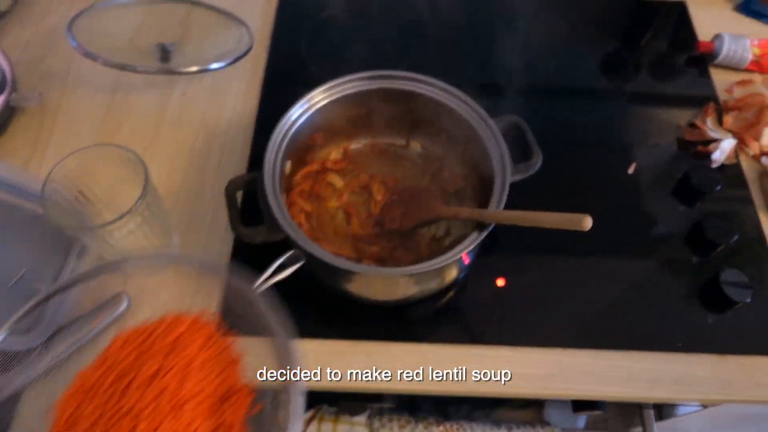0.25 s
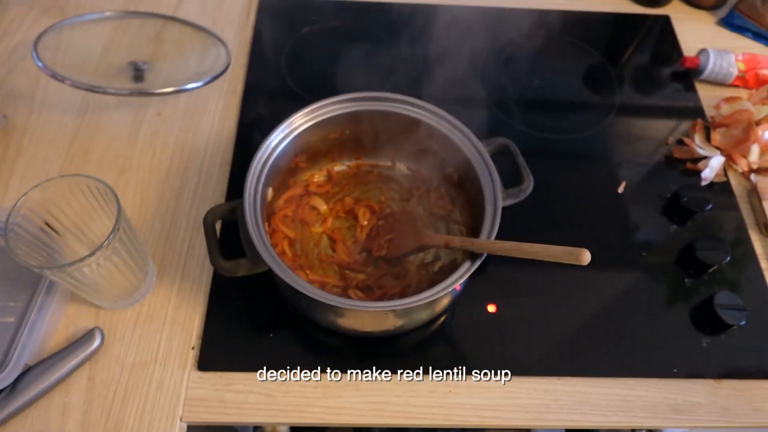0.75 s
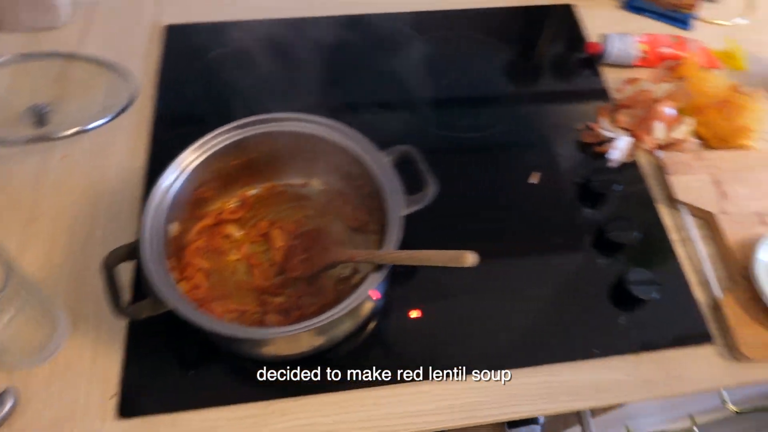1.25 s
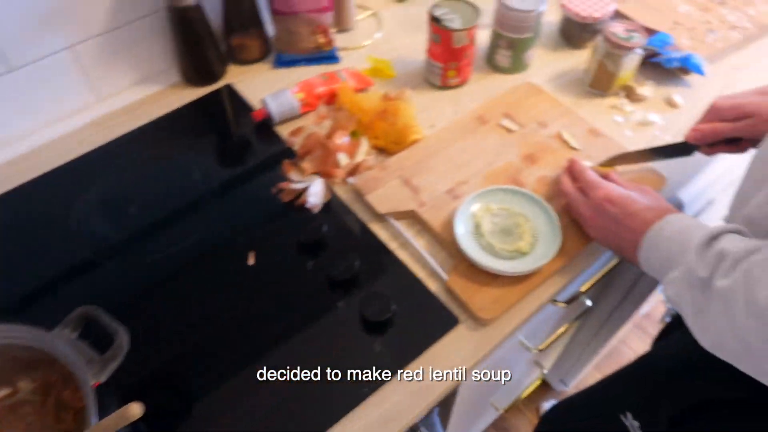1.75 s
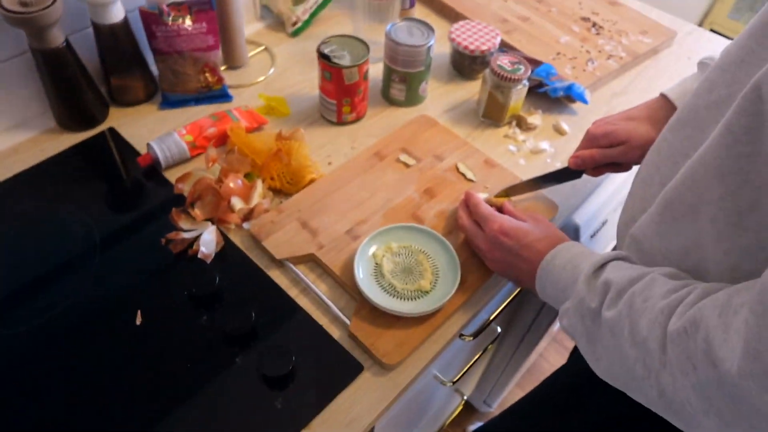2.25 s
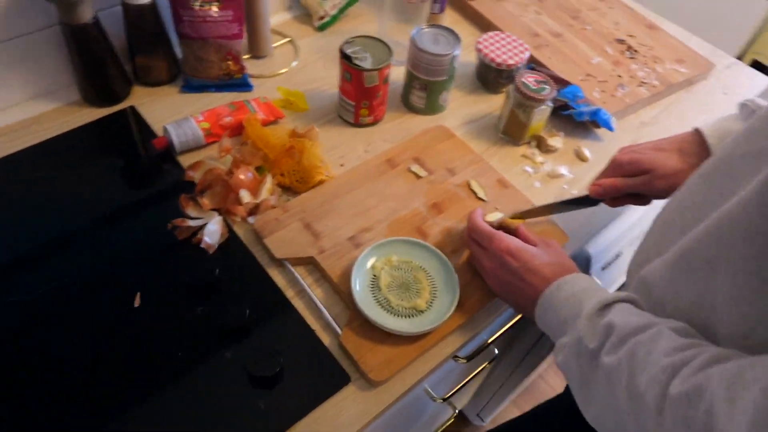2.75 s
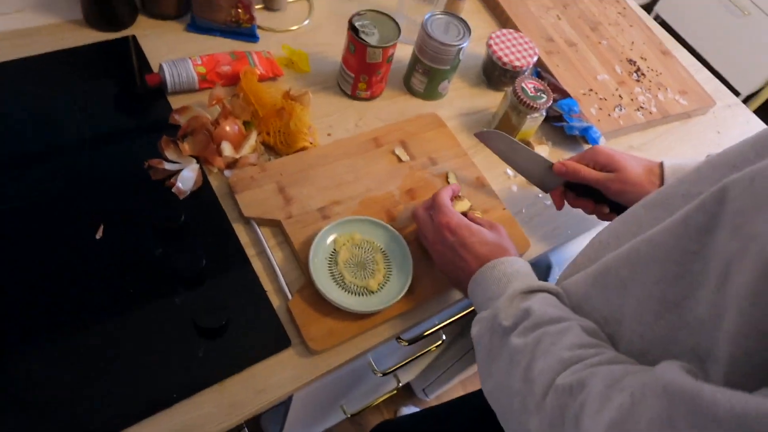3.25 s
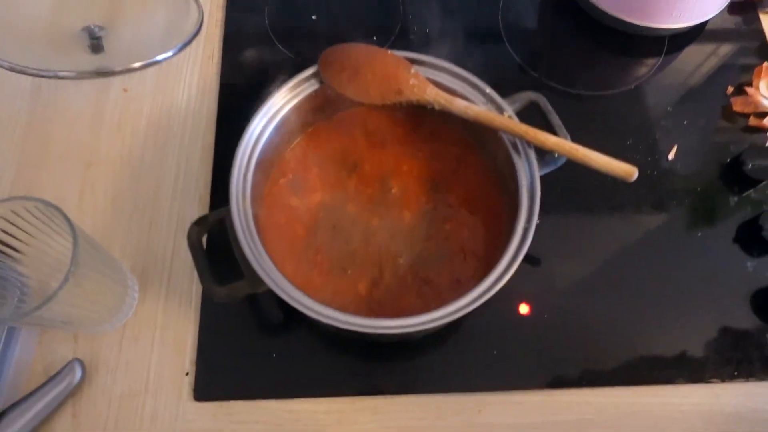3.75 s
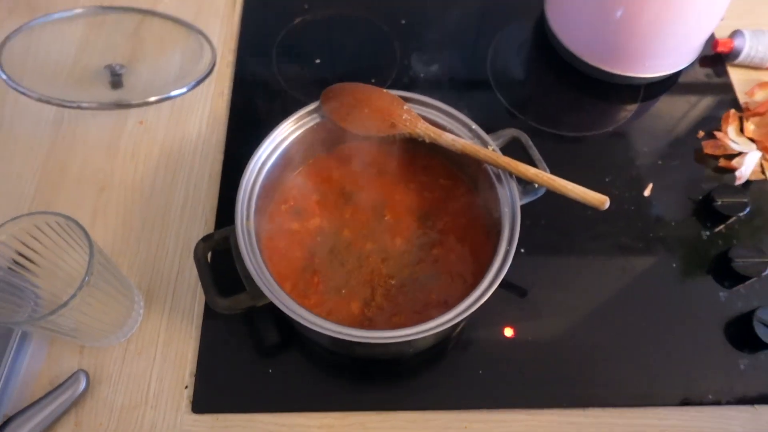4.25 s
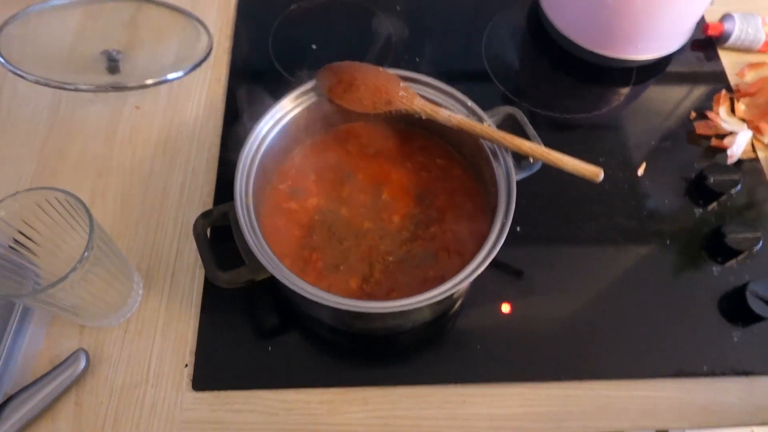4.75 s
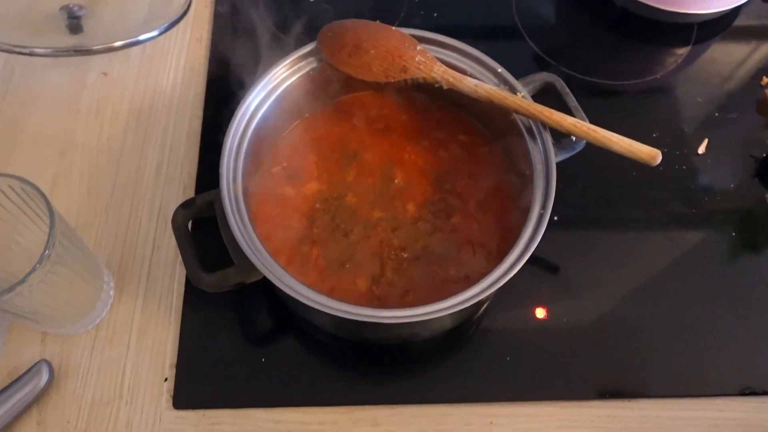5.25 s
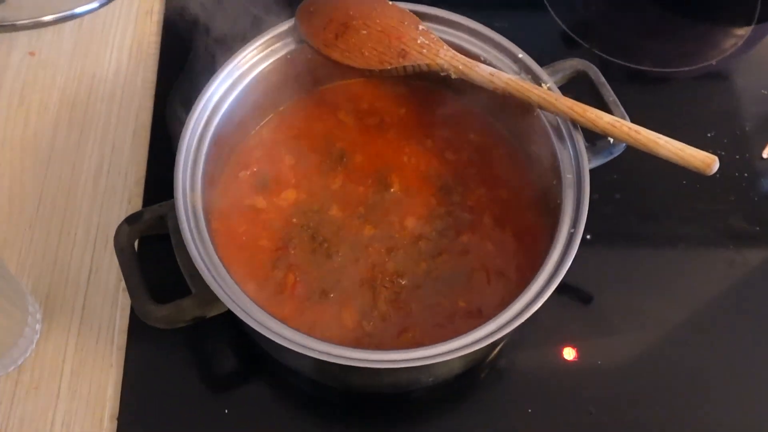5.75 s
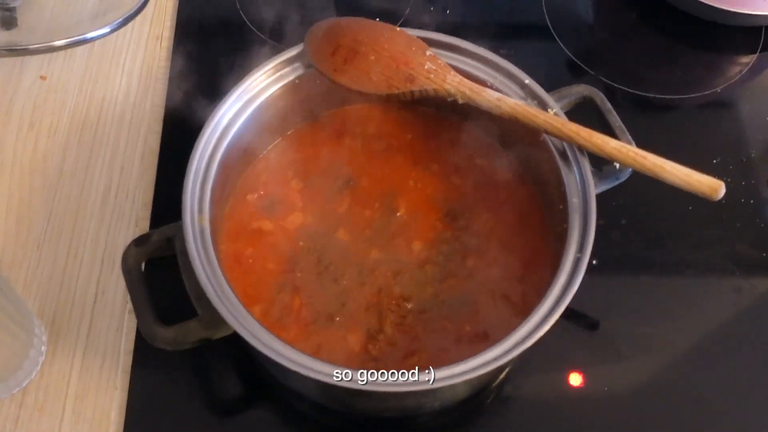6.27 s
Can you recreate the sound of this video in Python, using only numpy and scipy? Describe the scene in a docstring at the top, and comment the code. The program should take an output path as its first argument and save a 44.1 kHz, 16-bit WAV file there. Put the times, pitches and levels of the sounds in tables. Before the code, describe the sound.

A faint low thud fades under frying onions, with the pot ringing lightly. A sharp double snap opens a short, loud rush of wet hiss, quickly gone. Knife ticks and dull board knocks follow over quieter sizzle. The sound cuts almost to silence, then dense soup bubbling swells in, slightly right: crackly steam puffs, wet pops and clear plops. Close small-device microphone in a kitchen, taming loud peaks, with quiet appliance rumble.

```python
"""A soft low thud fades under onions frying in a steel pot: crackly noise, ringing pot tones and short spits.
A knife ticks, knocks and scrapes on a wooden board, and one wet burst of hiss goes off with a double snap.
After a short, almost silent gap thick soup fades in: seething noise, crackly puffs of bursting steam bubbles
and clear little plop notes. A faint appliance hum of rumble and wavering tones lies under both scenes.
The small microphone turns loud sounds down by itself (automatic gain control)."""
import sys
import numpy as np
from scipy import signal
from scipy.fft import rfft, irfft, next_fast_len
from scipy.io import wavfile
from scipy.ndimage import uniform_filter1d

SR = 44100
rng = np.random.default_rng(int(sys.argv[2]) if len(sys.argv) > 2 else 0)


def dump_mix(stems):
    """Bounce the given channels to the path in sys.argv[1] as a 16-bit WAV at rate SR."""
    frames = np.atleast_2d(stems).T  # one column per channel
    limited = np.clip(frames, -1, 1)  # hard clip at full scale
    pcm = np.round(limited * 32767).astype(np.int16)
    wavfile.write(sys.argv[1], SR, pcm)


N = 287091   # length [samples]
FIRST_ENDS_S, SECOND_STARTS_S = 3.566, 3.63
TURN_START_S, TURN_END_S = 1.3, 4   # the microphone turns from pot to board

# frying as the microphone swings over the pot and away:
# (time [s], sizzle [dB], lower ring of the pot [dB], upper ring [dB])
FRY_LEVELS = [(0.0, -36.5, -48, -71), (0.4, -36.5, -47.5, -76), (0.55, -35.5, -43, -57),
              (0.72, -35.5, -38, -48), (0.95, -35, -40, -51), (1.1, -33.5, -45, -40), (1.44, -36, -46, -80),
              (1.73, -39.5, -49, -80), (1.98, -36, -59, -78), (2.19, -39.5, -63, -75), (3.0, -39, -66, -57),
              (3.57, -40, -53, -61)]
# tone colour of the sizzle: (frequency [Hz], level [dB per Hz])
FRY_COLOUR = [(300, -30), (400, -19), (640, -9.5), (700, 0.5), (800, -4.5), (1000, -10), (1150, -3),
              (1600, -4), (2100, -1.5), (2900, 0.5), (6000, -1.5), (12000, -3), (16000, -5)]
# fat spitting in the pan: (time [s], nominal level [dB], frequency [Hz])
SPITS = [(0.536, -22, 9500), (0.839, -20, 4500), (1.017, -18.5, 7000), (0.5303, -21.5, 4200),
         (0.555, -24, 6500), (0.597, -24, 6800), (0.638, -23, 6800), (0.6545, -21, 6900),
         (0.723, -20, 6600), (0.7435, -21, 6570), (0.765, -20, 6000), (0.8565, -24, 6800),
         (0.922, -20, 7200), (1.007, -21, 6500), (1.401, -27, 5000), (0.9764, -16.5, 5100),
         (1.281, -23, 7070), (1.4497, -25, 4850), (1.664, -24, 9000), (1.746, -23, 4760),
         (1.7592, -15, 4700), (1.9207, -25, 4470), (1.9748, -19.5, 2300), (2.3484, -26, 9000),
         (2.366, -27, 5950)]
# the pot's two bright resonances: (frequency [Hz], width [Hz])
FRY_POT_RINGS = [(4700, 4350), (6700, 1500)]
# how alike left and right are for the frying: (frequency [Hz], likeness [0-1])
FRY_LIKENESS = [(60, .97), (400, .93), (700, .95), (1300, .988), (4400, .994), (8000, 1.0), (15000, 1.0)]
# the same once the pot lies off to the side: (frequency [Hz], likeness [0-1])
FAR_LIKENESS = [(200, .94), (400, .86), (1300, .86), (2400, .9), (4400, .82), (8000, .998), (15000, 1.0)]
AIR_DB = -14   # bright air against the sizzle
SPIT_CLICK_DB = -2   # opening click against the spit's nominal level

# a low thud dies away in the room: (frequency [Hz], level [dB], time to fall 60 dB [s])
THUD_MODES = [(112, -54, 0.58), (190, -49, 0.4), (229, -52, 0.4)]

# appliance noise: (time [s], rumble [dB], hum [dB])
APPLIANCE_LEVELS = [(0, -54.5, -66), (.3, -69.5, -69.5), (1, -67, -69), (1.5, -67, -73), (3.56, -65, -80.5),
                    (3.575, -105, -92), (3.63, -89, -90), (3.78, -76, -71), (3.9, -64.5, -58.5),
                    (6.51, -64.5, -55.5)]
# tone colour of the rumble: (frequency [Hz], level [dB per Hz])
RUMBLE_COLOUR = [(40, -52), (100, -30), (165, -43), (200, -10.5), (270, -15), (340, -1.5), (450, -15),
                 (560, -6), (700, -23), (900, -4), (1300, -53)]
# wavering motor lines, levels as at the second row of the appliance noise: (frequency [Hz], level [dB])
MOTOR_LINES = [(100, -94), (199, -80), (246, -82.5), (399, -73.5)]
HUM_HZ, HUM_WAVER_HZ = 372.5, 1.47

# knife blade ticks:
# (time of the top [s], level [dB], frequency [Hz], spread [ms], crack above the ring [dB])
TICKS = [(2.099, -33, 2400, .4, -12), (2.125, -25.5, 2160, 0.57, 12.5), (2.1359, -16.5, 2330, .8, -4),
         (2.1805, -26, 2400, 0.45, -19), (2.192, -22, 2440, 0.62, -3), (2.8332, -26, 2360, 0.484, -4),
         (3.0667, -33, 2600, 0.48, -14), (3.1834, -33, 2300, .8, -8), (3.316, -18, 2190, 0.5, -15),
         (3.3778, -20.5, 2300, 0.5, -21), (3.423, -29, 2400, .8, -10), (3.4537, -26, 2300, 0.41, -17)]
# dull knocks on the board: (time [s], level [dB], centre [Hz], share of the free ring time [ratio])
KNOCKS = [(0.336, -43, 320, 1.4), (1.759, -48, 400, 0.69), (2.124, -36, 720, 0.55), (2.805, -45, 560, 0.74),
          (2.828, -45, 380, 1.4), (3.028, -45.5, 427, 0.73), (3.136, -38.5, 376, 0.62)]
# ways the board rings: (frequency [Hz], level against the knock [dB], free time to fall 60 dB [s])
BOARD_MODES = [(334, -1, 0.09), (464, -1, 0.063), (525, 5, 0.047), (610, 7, 0.063), (760, 0, 0.035),
               (1000, 2, 0.03)]
# blade scraping and peeling: (start [s], length [s], level [dB], frequency [Hz], width [Hz])
SCRAPES = [(1.924, 0.18, -42, 2770, 2500), (3.018, 0.1, -46, 2350, 700), (3.127, 0.094, -45, 2220, 580),
           (3.405, 0.099, -44.5, 2300, 520)]
TICK_T60_S, TICK_TAIL_DB = .012, -16   # fall of the crack by 60 dB; the blade rings on faintly
KNOCK_PUFF_DB = -7   # dry rattle of the board against the knock's level
KNOCK_FALL_DB = 14   # loss of a mode one octave from the knock's centre
STROKE_EDGE_S = 0.011   # a scraping stroke sets in and lifts off
KNIFE_PAN_DB = 3.5   # the board lies a little to the left
WALL_DB, WALL_LAG_S = -10, .0007   # the tiled wall returns the knife from the side

# tone colour of the wet burst: (frequency [Hz], level [dB per Hz])
BURST_COLOUR = [(60, -58), (113, -26), (140, -43), (190, -14.5), (220, -23), (280, -19), (505, -22),
                (900, -13.5), (1300, -6), (2340, -2.5), (2910, -6), (3630, -5.5), (4900, -14.5),
                (5600, -29), (9000, -63)]
SNAP_S, SNAP_DB = 1.033, -10
SECOND_SNAP_LAG_S, SECOND_SNAP_DB = .0026, -8   # after and against the first snap
SNAP_HOLD_S = 0.0011
# the burst swells to its top, holds, then dies at a steady rate
BURST_DB, BURST_SWELL_DB, BURST_SWELL_S, BURST_HOLD_S, BURST_FALL_DB_PER_S = -8, 2, 0.0085, 0.052, 145.5
BURST_BASS_HZ, BURST_BASS_RISE_S = 500, 0.057   # the low end of the burst builds later

# vigour of the simmer between the bursts: (time [s], seething [dB])
SIMMER_LEVELS = [(3.6, -66), (3.635, -66), (3.68, -69), (3.78, -55), (3.97, -40), (4.05, -44.5),
                 (4.13, -48.5), (4.23, -44), (4.36, -42), (4.48, -40), (4.61, -47), (4.66, -43.5),
                 (4.76, -52), (4.84, -48), (4.98, -42.5), (5.12, -47.5), (5.2, -44.5), (5.38, -44.5),
                 (5.6, -42.5), (5.71, -41), (5.96, -42.5), (6.14, -40), (6.51, -44)]
# tone colour of the simmer: (frequency [Hz], level [dB per Hz])
SIMMER_COLOUR = [(200, -38), (290, -13), (450, -7.5), (563, -13.5), (694, 2.5), (979, -2.5), (1530, -3),
                 (2260, -2.5), (2870, -2), (6430, 2), (15100, -17.5), (16000, -14)]
# the pot colours the seething: (frequency [Hz], width [Hz], level [dB])
SEETHE_RINGS = [(1650, 340, -17), (2300, 290, -15), (3500, 480, -15.5), (5430, 450, -15)]
# how alike left and right are for the soup: (frequency [Hz], likeness [0-1])
SOUP_LIKENESS = [(60, 0.97), (240, 0.94), (950, 1), (1300, 0.9), (3770, 0.59), (9000, 0.6), (15000, 1)]
STEAM_DB = -2.5   # against the seething

# air and steel of the soup pot: (frequency [Hz], width [Hz], relative level [dB])
SOUP_POT_RINGS = [(808, 23, 14), (1325, 20, 3), (1580, 79, 7), (2040, 1120, 2.5), (3290, 31, -3),
                  (4800, 35, -8)]
# soup bubbles bursting, levels and fade time before the puff's own scaling:
# (time [s], peak of the body [dB], middle spit [dB], bright spray [dB], note [Hz], time to fall 60 dB [s])
BUBBLES = [(3.642, -48, -50.5, -51, 2210, 0.24), (3.698, -50, -47.5, -53, 3570, 0.086),
           (3.719, -37.5, -48, -56, 3510, 0.11), (3.743, -39, -43, -58, 1670, 0.044),
           (3.792, -37, -41, -52, 3520, 0.22), (3.826, -23, -33.5, -43, 3600, 0.11),
           (3.87, -28, -31.5, -34, 3380, 0.098), (3.88, -26, -27, -32, 3560, 0.059),
           (3.893, -25, -28.5, -29.5, 3400, 0.097), (3.912, -21.5, -26, -33, 2700, 0.097),
           (3.937, -26, -29.5, -45, 3530, 0.047), (3.979, -27.5, -33, -49, 2740, 0.06),
           (3.991, -30, -33, -33, 3440, 0.088), (4.005, -25, -29, -35, 3500, 0.09),
           (4.151, -27, -41, -41, 2710, 0.15), (4.171, -21, -26.5, -30, 3400, 0.13),
           (4.251, -27.5, -38, -47, 2650, 0.048), (4.286, -38, -31, -40, 2700, 0.055),
           (4.331, -38, -37, -37, 2540, 0.055), (4.356, -25, -34, -36, 1980, 0.04),
           (4.364, -24, -28.5, -40, 2600, 0.03), (4.382, -20, -28.5, -42, 2200, 0.04),
           (4.395, -21, -32, -48, 2660, 0.075), (4.414, -20.5, -26.5, -31, 2560, 0.09),
           (4.433, -40, -26.5, -33, 2810, 0.064), (4.448, -23, -28, -29, 2050, 0.082),
           (4.485, -27, -41, -50, 2130, 0.047), (4.507, -42, -34, -48, 2710, 0.044),
           (4.534, -28, -48, -63, 1510, 0.04), (4.627, -26.5, -30, -25.5, 2220, 0.084),
           (4.647, -33, -39, -34, 2600, 0.07), (4.777, -35, -39, -44, 2510, 0.053),
           (4.789, -29, -43, -58, 2570, 0.081), (4.811, -26, -36, -52, 1500, 0.029),
           (4.829, -17, -32, -50, 3240, 0.044), (4.847, -18, -29, -44, 1700, 0.049),
           (4.892, -19.5, -33.5, -53, 1720, 0.064), (4.945, -22, -42, -53, 2020, 0.041),
           (4.992, -18.5, -24, -27.5, 3130, 0.046), (5.003, -20, -29, -33.5, 1670, 0.12),
           (5.026, -31, -30, -38, 3240, 0.061), (5.044, -22, -35, -40, 2290, 0.073),
           (5.076, -27, -36, -42, 2460, 0.06), (5.137, -14, -20.5, -29.5, 2560, 0.061),
           (5.191, -21.5, -32.5, -36, 2450, 0.062), (5.247, -24.5, -28.5, -23, 2320, 0.058),
           (5.277, -22, -41, -48, 3250, 0.052), (5.314, -31, -46, -45, 3160, 0.055),
           (5.329, -21.5, -48, -60, 1285, 0.054), (5.384, -24.5, -58, -54, 2660, 0.061),
           (5.404, -22, -31, -50, 1630, 0.041), (5.44, -25, -33, -38, 2640, 0.069),
           (5.454, -17.5, -26, -34, 3120, 0.068), (5.466, -21, -31.5, -33, 2040, 0.11),
           (5.513, -24.5, -36.5, -50, 2690, 0.066), (5.541, -16, -28, -45, 2500, 0.07),
           (5.555, -17.5, -23, -31.5, 2700, 0.12), (5.608, -22, -33.5, -40, 2260, 0.11),
           (5.649, -29, -43, -38, 2170, 0.043), (5.676, -19.5, -33, -34, 2640, 0.04),
           (5.686, -15.5, -19.5, -23.5, 2200, 0.027), (5.695, -14.5, -23.5, -22, 1570, 0.083),
           (5.76, -24.5, -33, -44, 1780, 0.038), (5.781, -23, -29.5, -32, 3320, 0.061),
           (5.8, -16, -21.5, -28, 2360, 0.072), (5.813, -16, -25, -26, 1550, 0.07),
           (5.844, -26, -37, -52, 2040, 0.05), (5.889, -22.5, -48, -39, 1800, 0.037),
           (5.93, -26, -30.5, -31, 2020, 0.12), (5.973, -17, -28, -30.5, 3250, 0.079),
           (5.992, -24.5, -32, -32, 2600, 0.055), (6.046, -31, -34, -38, 2680, 0.083),
           (6.055, -23.5, -31, -31.5, 2520, 0.065), (6.106, -20, -29, -40, 2650, 0.038),
           (6.137, -20, -34, -46, 3450, 0.056), (6.165, -30, -34, -39, 3580, 0.033),
           (6.2, -23.5, -28, -29.5, 1530, 0.052), (6.221, -31, -30, -35, 2650, 0.042),
           (6.23, -17, -21.5, -25.5, 3460, 0.07), (6.249, -20, -35, -36, 2350, 0.039),
           (6.299, -26, -36, -44, 2850, 0.055), (6.313, -14, -24, -28.5, 1980, 0.12),
           (6.324, -17.5, -25.5, -39, 1840, 0.071), (6.36, -23.5, -33, -41, 2180, 0.035),
           (6.401, -30.5, -37.5, -42, 2400, 0.061), (6.444, -22, -31, -37, 2110, 0.047)]
# clear wet plops as a cavity snaps shut:
# (time of the top [s], level [dB], frequency [Hz], spread, at least 0.1 used [ms])
PLOPS = [(3.8804, -20, 4200, 0.17), (3.8975, -22, 5000, 0.14), (3.9128, -22, 4000, 0.13),
         (4.0064, -15, 3860, 0.23), (4.789, -27.5, 2800, 0.13), (4.8887, -25, 2000, .5),
         (4.3988, -20, 2610, 0.14), (4.634, -24, 2020, 0.32), (4.8485, -26, 825, 1.4),
         (4.856, -16, 1770, 0.21), (4.8991, -18, 2100, 0.4), (4.9895, -18, 2980, 0.14),
         (4.9937, -14, 2600, 0.22), (5.0102, -34, 800, 3.2), (5.0275, -20, 3860, 0.36),
         (5.0853, -28, 2520, 1.1), (5.1369, -9.5, 2490, 0.18), (5.33, -17, 1550, 0.18),
         (5.467, -21, 2400, 0.24), (5.2507, -14, 7900, 0.086), (5.5153, -25, 3000, 0.2),
         (5.542, -29, 1700, 0.34), (5.557, -14, 2830, 0.2), (5.567, -24, 2610, 0.3),
         (5.6022, -24, 2300, 0.5), (5.6469, -28, 2400, 0.87), (5.6088, -18.5, 2300, 0.49),
         (5.6874, -14, 2220, 0.89), (5.6937, -19, 2300, 0.24), (5.714, -23, 1850, 0.4),
         (5.7331, -26, 1500, .5), (5.8017, -28, 3500, 0.14), (5.8143, -22, 1620, 0.3),
         (5.8151, -28.5, 775, 0.99), (5.9744, -15, 2940, 0.32), (6.057, -12.5, 2510, 0.11),
         (5.9798, -21, 2800, 0.23), (6.137, -26, 3560, 0.18), (6.151, -22, 3500, 0.19),
         (6.2208, -23, 2600, .15), (6.2218, -29, 810, 1.3), (6.2392, -20, 3860, 0.2),
         (6.2503, -15, 2490, 0.87), (6.3134, -21, 1990, 0.3), (6.4797, -23.5, 2220, 0.54)]
BODY_CREST_DB = 8   # peak of a puff above its rms
SOUP_PAN_DB, SOUP_PAN_SPREAD_DB = -4.5, 1   # the pot is to the right; bubbles burst all over it
# rise time as a share of the fade time at -24.5 dB; dB shorter for each dB louder; upper limit
RISE_SHARE, RISE_QUICKENS, LONGEST_RISE_S = 0.031, 0.17, 0.0023
POP_DB, POP_CYCLES = 1.5, 2.4   # the skin tears with a click: against the peak, cycles to fall 60 dB
# small bubbles ringing inside each puff: rate, rough length of the ring, share in the mix
DROPLETS_PER_S, DROPLET_CYCLES, DROPLET_SHARE = 500, 12, 0.43

MONO_BELOW_HZ = 370   # the two microphone ports lie close together
CUTOFF_HZ = 15800


def amp(db):
    """Turn decibels into a gain."""
    return np.exp(np.asarray(db) * (np.log(10) / 20))


def rms_one(x):
    """Scale to an average strength (rms) of 1."""
    return x / np.sqrt(np.mean(x ** 2) + 1e-20)


def in_time(rows):
    """Draw each column of a table as a curve, one value a sample."""
    s, *columns = np.transpose(rows)
    return [np.interp(np.arange(N) / SR, s, column) for column in columns]


def at_hz(points, hz):
    """Read a table between its points on a log-frequency axis."""
    table_hz, values = np.array(points).T
    return np.interp(np.log(hz), np.log(table_hz), values)


def drift(rate):
    """Smooth random wandering of spread 1; a higher rate [Hz] wanders faster."""
    r = np.exp(-80 * np.pi * rate / SR)   # made at one value per 40 samples
    noise = rng.standard_normal(N // 40 + 2002)
    slow = signal.lfilter([1], [1, -2 * r, r * r], noise)[2000:]
    return np.interp(np.arange(N) / 40, np.arange(len(slow)), rms_one(slow))


def crackle(per_s, spread_db, share):
    """Raw noise for middle and side, with tiny random clicks in the middle."""
    pair = rng.standard_normal((2, N))
    born = rng.random(N) < per_s / SR
    sizes = amp(spread_db * np.minimum(rng.exponential(1, N), 5)) * np.sign(pair[1])
    share = np.clip(share, 0, 1)
    pair[0] = np.sqrt(share) * rms_one(sizes * born) + np.sqrt(1 - share) * pair[0]
    return pair


def coloured(source, spectrum, likeness, later=None):
    """Give noise a tone colour and a left-right likeness, which may change as the microphone turns; rms 1."""
    size = next_fast_len(N, real=True)
    hz = np.maximum(np.fft.rfftfreq(size, 1 / SR), 10)
    mid, side = rfft(source, size) * amp(at_hz(spectrum, hz))
    alike = np.clip([at_hz(likeness, hz), at_hz(later or likeness, hz)], 0, 1)
    near, far = irfft(np.sqrt((1 - alike) / (1 + alike)) * side, size)[:, :N]
    turned = np.interp(np.arange(N) / SR, [TURN_START_S, TURN_END_S], [0, 1])
    side_now = near + turned * (far - near)
    return rms_one(irfft(mid, size)[:N] + side_now * [[1], [-1]])


def band(x, low_hz, high_hz):
    """Keep only a range of frequencies; rms 1."""
    return rms_one(signal.sosfilt(signal.butter(2, [low_hz, high_hz], "band", fs=SR, output="sos"), x))


def high_pass(x, hz):
    """Remove the bass: small things radiate none."""
    return signal.sosfilt(signal.butter(4, hz, "high", fs=SR, output="sos"), x)


def resonate(x, hz, width_hz):
    """Make a sound ring at one frequency, with gain 1 there."""
    r = np.exp(-np.pi * width_hz / SR)
    feedback = [1, -2 * r * np.cos(2 * np.pi * hz / SR), r * r]
    return signal.lfilter(np.array([1, 0, -1]) * (1 - r * r) / 2, feedback, x)


def resonate_twice(x, hz, width_hz):
    """Ring through a narrow and a wider resonance in a row; rms 1."""
    return rms_one(resonate(resonate(x, hz, width_hz), hz, 2 * width_hz))


def add(out, s, sound):
    """Mix a short sound in at a time."""
    i = round(s * SR)
    out[..., i:i + sound.shape[-1]] += sound[..., :N - i]


def add_blip(out, s, peak_db, hz, spread_ms, sides=1):
    """A few cycles under a bell-shaped swell, centred on its top."""
    t = np.arange(-SR // 100, SR // 100) / SR
    bell = np.exp(-.5 * (1000 * t / max(spread_ms, .1)) ** 2)
    add(out, s + t[0], sides * amp(peak_db) * bell * np.sin(2 * np.pi * hz * t))


def thud():
    """Low room modes swell briefly and ring out."""
    out, t = np.zeros(N), np.arange(SR) / SR
    ring = sum(amp(level_db - 60 * t / t60) * np.sin(2 * np.pi * hz * t) for hz, level_db, t60 in THUD_MODES)
    add(out, 0, ring * (1 - np.exp(-t / .012)))
    return out


def frying():
    """Dense micro-pops of water in fat; the pot's resonances swell when the microphone looks into it."""
    sizzle_db, *rings_db = in_time(FRY_LEVELS)
    source = crackle(3000, spread_db=3.0, share=0.2) * amp(0.86 * drift(23))
    out = amp(sizzle_db) * coloured(source, FRY_COLOUR, FRY_LIKENESS, FAR_LIKENESS)
    wide = coloured(source, [(100, 0.0034), (16000, 0)], FRY_LIKENESS, FAR_LIKENESS)
    out += amp(sizzle_db + AIR_DB) * band(wide, 5300, 22000)
    for (hz, width_hz), level_db in zip(FRY_POT_RINGS, rings_db):
        out += amp(level_db + 2.0 * drift(30)) * resonate_twice(wide, hz, width_hz)
    t = np.arange(SR // 20) / SR
    for s, peak_db, hz in SPITS:
        hiss = rng.standard_normal(len(t))
        spit = rms_one(resonate(hiss, hz, 1200.0)) + 0.14 * band(hiss, 1800, 20000)
        click = amp(SPIT_CLICK_DB - 60 * t / .0012) * np.sin(2 * np.pi * hz * t)
        add(out, s, amp(peak_db) * high_pass(amp(-9.0 - 60 * t / 0.046) * spit + click, 900))
    return out


def appliances():
    """Low rumble of the room, one slightly wavering hum and weaker motor lines."""
    rumble_db, hum_db = in_time(APPLIANCE_LEVELS)
    rumble = coloured(rng.standard_normal((2, N)), RUMBLE_COLOUR, [(100, 0.72), (900, 0.38)])
    hum_phase = 2 * np.pi * np.cumsum(HUM_HZ + HUM_WAVER_HZ * drift(2.4)) / SR
    motor = np.zeros(N)
    for hz, level_db in MOTOR_LINES:
        phase = 2 * np.pi * np.cumsum(hz + .8 * drift(2.6)) / SR
        motor += amp(level_db + 1.6 * drift(3)) * np.sin(phase)
    # the motor lines follow the rumble's level
    low = amp(rumble_db) * (rumble + motor / amp(APPLIANCE_LEVELS[1][1]))
    return low + amp(hum_db + 2.5 + 1.1 * drift(3.4)) * np.sin(hum_phase)


def knife():
    """Ticks are a short ring of the blade with a broad crack; knocks ring the board; scrapes are tiny ticks."""
    out, t = np.zeros(N), np.arange(SR // 10) / SR
    for s, peak_db, hz, spread_ms, crack_db in TICKS:
        hiss = rng.standard_normal(len(t))
        add_blip(out, s, peak_db, hz, spread_ms)
        tail = amp(TICK_TAIL_DB - 60 * t / 0.054) * rms_one(resonate(hiss, hz, 470.0))
        crack = amp(crack_db - 60 * t / TICK_T60_S) * band(hiss, 560, 7800)
        shape = (1 - np.exp(-t / 0.00075)) * amp(peak_db)
        add(out, s - 2 * spread_ms / 1000, shape * (tail + crack))
    for s, peak_db, centre_hz, free in KNOCKS:
        for hz, level_db, t60 in BOARD_MODES:
            own_db = rng.normal(0, 1.5)   # each knock excites the modes a little differently
            loss_db = KNOCK_FALL_DB * np.log2(hz / centre_hz) ** 2
            fall = amp(peak_db + level_db + own_db - loss_db - 60 * t / (free * t60))
            add(out, s, fall * (1 - np.exp(-t / 0.0016)) * np.sin(2 * np.pi * hz * t))
        puff = band(rng.standard_normal(len(t)), 0.59 * centre_hz, 1.8 * centre_hz)
        add(out, s, amp(peak_db + KNOCK_PUFF_DB - 60 * t / 0.039) * puff)
    grit = crackle(480, spread_db=-3.5, share=0.35)[0]
    now = np.arange(N) / SR
    for s, length_s, level_db, hz, width_hz in SCRAPES:
        stroke = np.clip(np.minimum(now - s, s + length_s - now) / STROKE_EDGE_S, 0, 1)
        out += amp(level_db) * stroke * resonate_twice(grit, hz, width_hz)
    return high_pass(out, 216)


def burst():
    """A double snap, then a swelling and dying rush of crackly hiss."""
    t = np.maximum(np.arange(N) / SR - SNAP_S, 0)
    source = crackle(1500, spread_db=3.0, share=0.22)
    hiss = coloured(source, BURST_COLOUR, [(100, 0.96), (600, 0.95), (8000, 0.71)])
    upper = signal.sosfilt(signal.butter(1, BURST_BASS_HZ, "high", fs=SR, output="sos"), hiss)
    start = 1 - np.exp(-t / 0.00013)   # silent before the snap
    level_db = BURST_DB - BURST_SWELL_DB * np.exp(-t / BURST_SWELL_S)
    level_db -= BURST_FALL_DB_PER_S * np.maximum(t - BURST_HOLD_S, 0)
    bass = np.minimum(t / BURST_BASS_RISE_S, 1) ** 2 * (hiss - upper)
    rush = amp(level_db + 0.98 * drift(60)) * (start * upper + bass)
    snap = start * amp(-60 * np.maximum(t - SNAP_HOLD_S, 0) / 0.017)
    snap += amp(SECOND_SNAP_DB - 60 * (t - SECOND_SNAP_LAG_S) / 0.014) * (t > SECOND_SNAP_LAG_S)
    # rms 1 over the whole scene makes a short snap tall, so it is turned down by 21 dB
    ring = amp(SNAP_DB - 21) * high_pass(band(hiss * snap, 900, 7900), 700)
    crack = amp(-9 - 60 * t / .007) * start * band(rng.standard_normal(N), 4000, 13000)
    return (rush + ring + crack) * amp([[-.7], [.7]])   # a little to the right


def simmer():
    """Small bubbles seethe without pause, steam hisses above them."""
    seethe_db, = in_time(SIMMER_LEVELS)
    fine = coloured(crackle(2000, spread_db=7.0, share=0.084), SIMMER_COLOUR, SOUP_LIKENESS)
    rings = sum(amp(db + 2.0 * drift(14)) * rms_one(resonate(fine, hz, width)) for hz, width, db in SEETHE_RINGS)
    low = amp(seethe_db + 1.86 * drift(33)) * (band(fine, 246, 3900) + rings)
    high = amp(seethe_db + STEAM_DB + 2.0 * drift(14)) * band(fine, 4030, 21000)
    return low * amp([[-1.8], [1.8]]) + high * amp([[-1.1], [1.1]])   # both to the right


def droplets(low_hz, high_hz):
    """Random clicks dealt to resonators spread in pitch; rms 1."""
    sizes = amp(1.6 * np.minimum(rng.exponential(1, N), 3))
    born = (rng.random(N) < DROPLETS_PER_S / SR) * sizes
    dealt = rng.integers(0, 16, N)
    out = np.zeros(N)
    for k, hz in enumerate(np.geomspace(low_hz, high_hz, 16)):
        clicks = born * (dealt == k) + 1e-18
        out += hz ** -.5 * resonate(clicks, hz, 2.5 * hz / DROPLET_CYCLES)
    return rms_one(out)


def random_sides():
    """Left and right gains for a random spot over the soup pot."""
    pan_db = SOUP_PAN_DB + SOUP_PAN_SPREAD_DB * rng.standard_normal()
    return amp([[pan_db / 2], [-pan_db / 2]])


def sputters():
    """Each burst throws a crackly puff into three ranges, with pot rings, the bubble's note and a weaker tail."""
    source = crackle(1500, spread_db=2.5, share=0.3)
    wide = coloured(source, [(100, 0.0), (6000, 23.0), (16000, 15)], SOUP_LIKENESS)
    pot = np.zeros((2, N))
    for k, (hz, width, db) in enumerate(SOUP_POT_RINGS):
        pot += (-1) ** k * amp(db) * resonate(wide, hz, width)   # neighbours in opposite sign
    body = rms_one(band(wide, 920, 2160) + 0.98 * rms_one(pot) + DROPLET_SHARE * droplets(1100, 3500))
    spit = rms_one(band(wide, 2390, 5450) + DROPLET_SHARE * droplets(3220, 6930))
    spray = band(wide, 7240, 14500)
    powers, notes, t = np.zeros((3, 2, N)), np.zeros((2, N)), np.arange(SR // 5) / SR
    for s, peak_db, spit_db, spray_db, hz, t60 in BUBBLES:
        body_db = peak_db - BODY_CREST_DB
        sides = random_sides()
        rise_s = RISE_SHARE * t60 * amp(-RISE_QUICKENS * (peak_db + 24.5))
        rise_s = np.clip(rise_s, .0003, LONGEST_RISE_S)
        swell, after = np.minimum(t / rise_s, 1) ** 2, np.maximum(t - rise_s, 0)
        # (level [dB], stretch of the fade, strength of the panning)
        puffs = [(body_db - 3.5, 1.2, .95), (spit_db, 1.05, 1.05), (spray_db, .8, .35)]
        for power, (level_db, slower, spread) in zip(powers, puffs):
            fall = amp(-120 * after / (max(t60, .01) * slower))
            fall += amp(2 * -18 - 120 * after / (0.53 * slower))   # the lingering tail
            # powers of unrelated puffs add up
            add(power, s, amp(2 * level_db) * fall * swell * sides ** (2 * spread))
        # sudden low bursts that are mostly body ring clearest
        clear = (body_db - spit_db + 7.5) / 12 - rise_s / 0.036 - max(hz - 2600, 0) / 900
        note = np.sin(2 * np.pi * hz * t * (1 + 1.86 * t))   # the opening cavity rises in pitch
        add(notes, s, np.clip(clear, 0, 1) * amp(body_db - 60 * after / 0.036) * swell * note * sides)
        pop = amp(peak_db + POP_DB - 60 * t * hz / POP_CYCLES) * np.sin(2 * np.pi * hz * t)
        add(notes, s, pop * sides)
        # steam still leaving through the hole
        whistle = rms_one(resonate(rng.standard_normal(len(t)), hz, 360.0))
        add(notes, s, amp(body_db - 8.5 - 60 * after / 0.2) * swell * whistle * sides)
    puffed = sum(np.sqrt(power) * sound for power, sound in zip(powers, [body, spit, spray]))
    return high_pass(notes, 690) + puffed


def plops():
    """Each plop is a brief note somewhere over the pot."""
    out = np.zeros((2, N))
    for row in PLOPS:
        add_blip(out, *row, sides=random_sides())
    return high_pass(out, 480)


def scene():
    """The frying scene stops short; the soup scene starts after a gap, over the same appliance noise."""
    t = np.arange(N) / SR
    blade = knife()
    wall = amp(WALL_DB) * np.interp(t - WALL_LAG_S, t, high_pass(blade, 830)) * [[1], [-1]]
    board = blade * amp([[KNIFE_PAN_DB / 2], [-KNIFE_PAN_DB / 2]])
    first = thud() + frying() + board + wall + burst()
    second = simmer() + sputters() + plops()
    in_gap = amp(-14.0) * (t > FIRST_ENDS_S)   # the soup is held down during the gap
    return first * (t < FIRST_ENDS_S) + second * np.where(t > SECOND_STARTS_S, 1, in_gap) + appliances()


def record(dry):
    """Small microphone: loud sounds are ducked, peaks rounded, bass made mono, deep bass and top removed."""
    level_db = 10 * np.log10(uniform_filter1d(np.mean(dry ** 2, axis=0), size=88) + 1e-12)
    release = 360.0 * np.arange(N) / SR   # the held level falls by 360 dB a second
    held_db = np.maximum.accumulate(level_db + release) - release
    duck_db = -.8 * np.maximum(held_db + 12.5, 0)   # only above -12.5 dB
    duck = signal.lfilter([.02], [1, -.98], amp(duck_db), zi=[.98])[0]   # smooth the gain
    left, right = np.tanh(dry * duck)
    # bass reaches both ports alike
    side = signal.sosfilt(signal.butter(2, MONO_BELOW_HZ, "high", fs=SR, output="sos"), left - right)
    pair = (left + right + side * [[1], [-1]]) / 2
    thin = high_pass(pair, 85)
    return signal.sosfilt(signal.ellip(12, .5, 70, CUTOFF_HZ, fs=SR, output="sos"), thin)


dry = scene()
out = record(dry)
dump_mix(out)
```